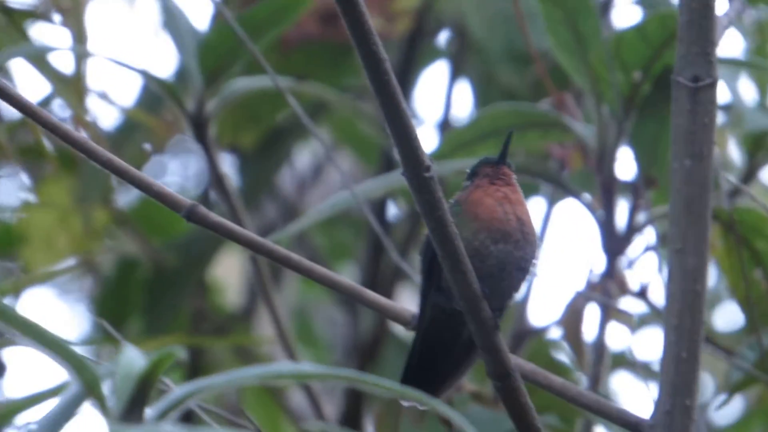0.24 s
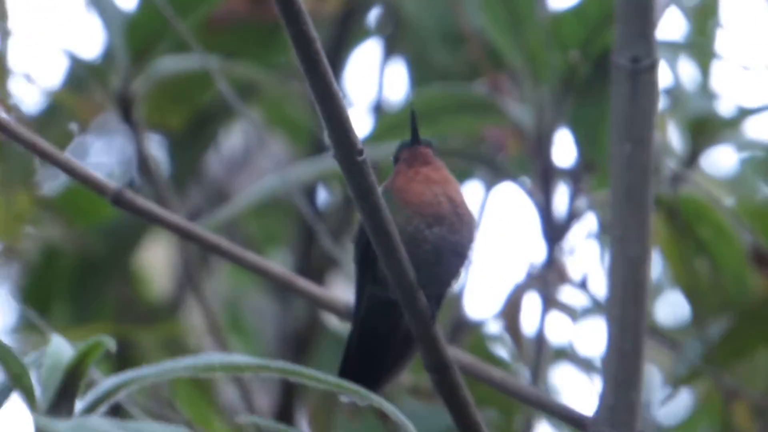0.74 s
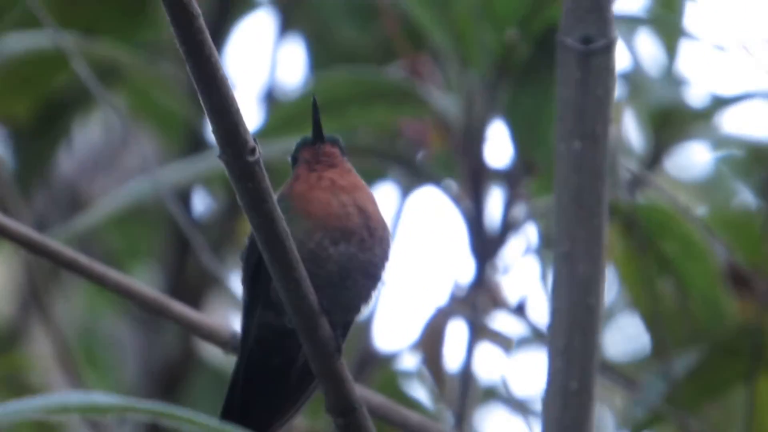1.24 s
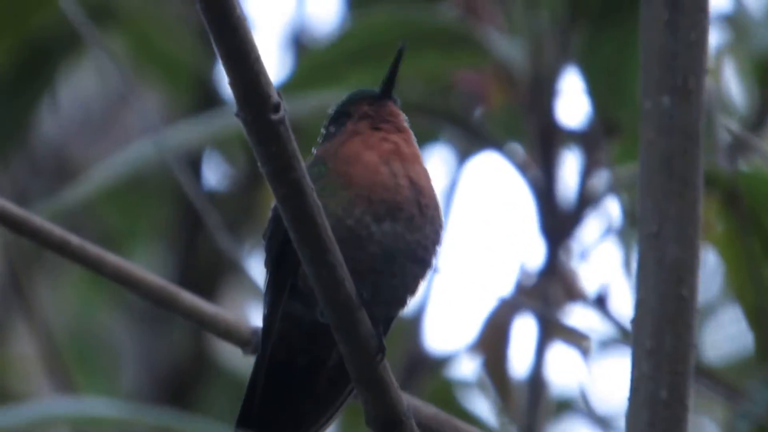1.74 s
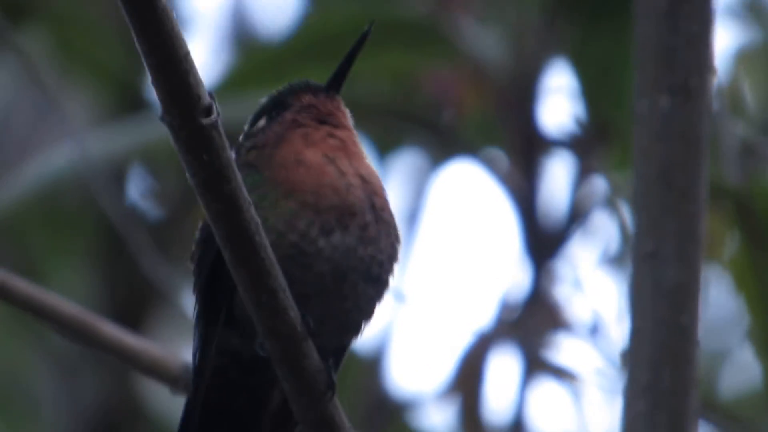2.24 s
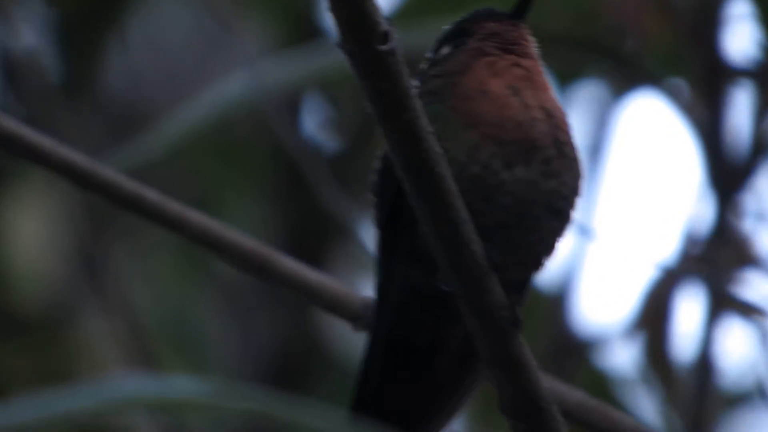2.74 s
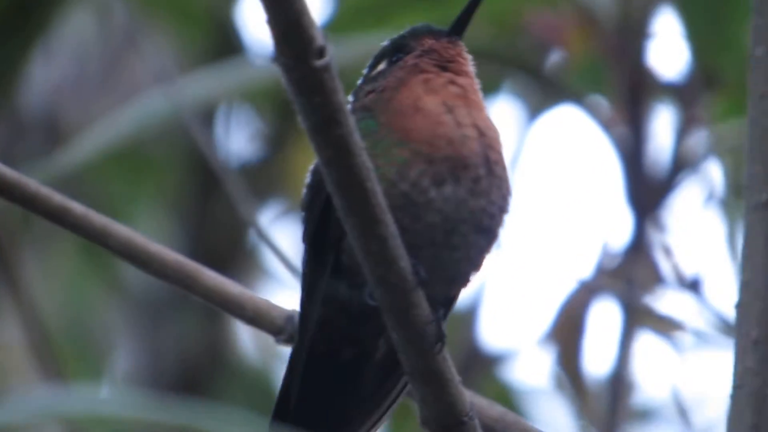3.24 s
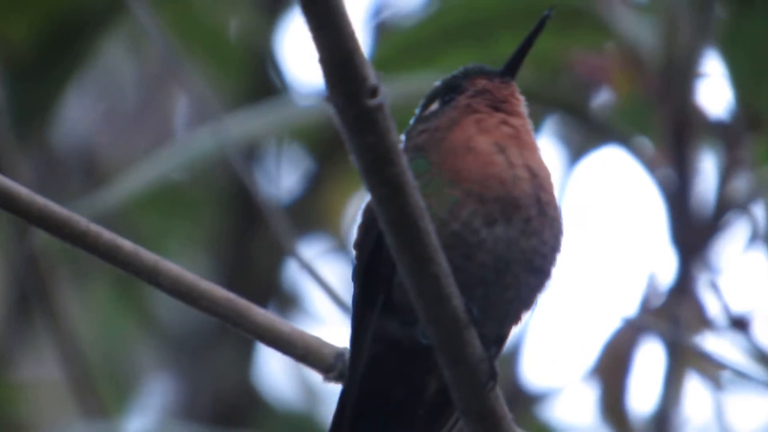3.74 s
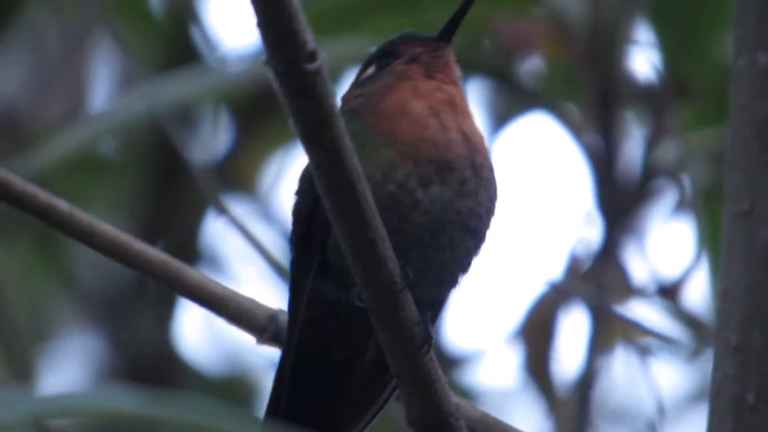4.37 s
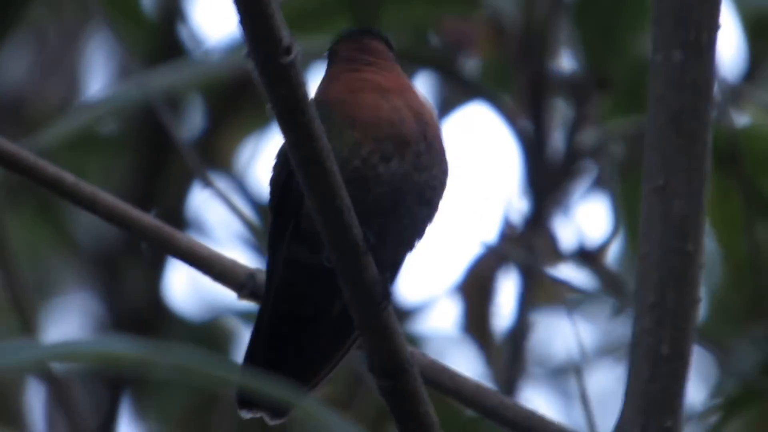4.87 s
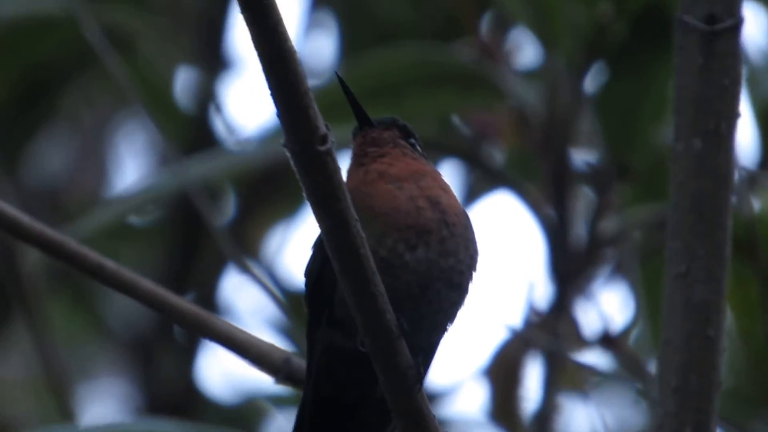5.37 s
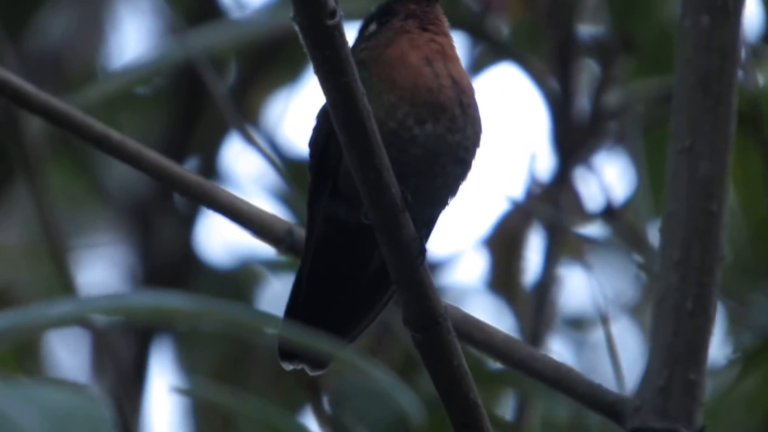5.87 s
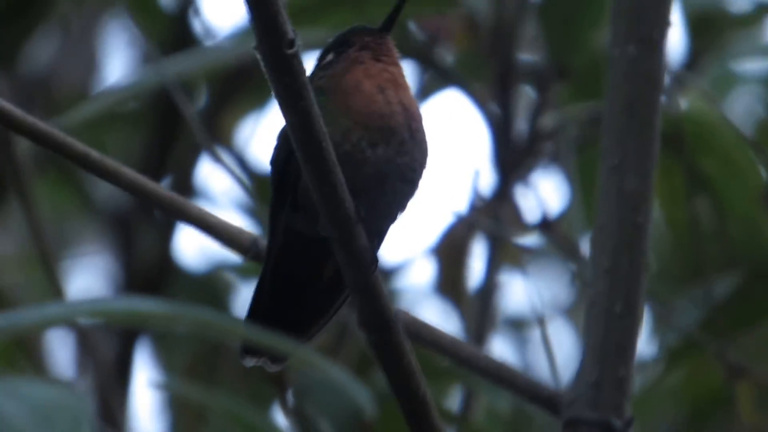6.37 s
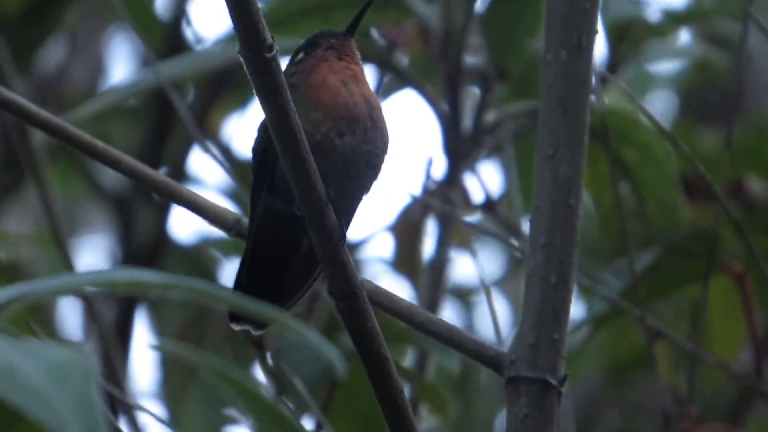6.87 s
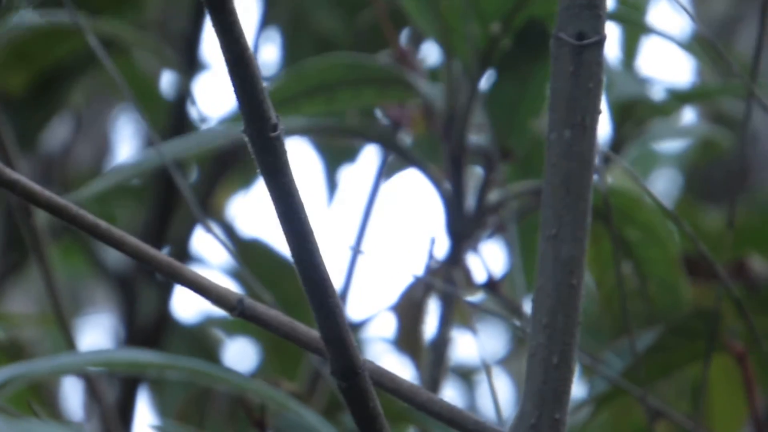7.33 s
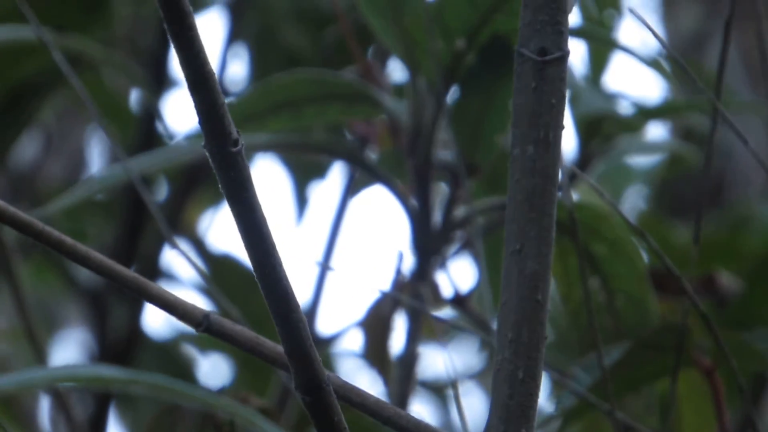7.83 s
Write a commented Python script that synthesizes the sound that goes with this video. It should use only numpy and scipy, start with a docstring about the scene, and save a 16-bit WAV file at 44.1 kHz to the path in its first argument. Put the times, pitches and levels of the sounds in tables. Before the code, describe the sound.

Quiet woodland wash with short faint whistles, fingers clicking and lens ticking on a camera, a hard click early, a distant chipping run at the end.

```python
"""Thin whistles come from the trees of a quiet mountain forest: gliding sine tones, each with an echo.
A far bird starts a run of raspy chips, from harmonics and modulated noise; a hummingbird whirrs off in puffs.
Fingers click, rub and bump on the hand-held zoom camera; its lens ticks and purrs: filtered bursts and decaying modes.
One sharp click ducks the gain of its two microphones. Fainter whistlers and a wide noise wash lie behind."""
import sys
import numpy as np
from scipy import signal
from scipy.fft import rfft, irfft, next_fast_len
from scipy.io import wavfile
from scipy.ndimage import uniform_filter1d

SR = 44100
rng = np.random.default_rng(int(sys.argv[2]) if len(sys.argv) > 2 else 0)


def output_pcm(signal):
    """Save a mono or channel-first signal as 16-bit PCM at the path in sys.argv[1].

    Samples are clipped to [-1, 1] before scaling.
    """
    pcm = np.clip(np.atleast_2d(signal).T, -1, 1) * 32767
    wavfile.write(sys.argv[1], SR, np.round(pcm).astype(np.int16))


N = 357077
TIME = np.arange(N) / SR
SIZE = next_fast_len(N, real=True)
FREQ = np.fft.rfftfreq(SIZE, 1 / SR)


def amp(db):
    """Decibels to gain."""
    return 10 ** (np.asarray(db) / 20)


def unit(x):
    """Scales to rms 1."""
    return x / np.sqrt(np.mean(x ** 2) + 1e-20)


def read(points, hz):
    """Reads a spectrum table on a log-frequency axis."""
    f, value = np.transpose(points)
    return np.interp(np.log(hz + 1), np.log(np.maximum(f, 0) + 1), value)


def add(mix, s, sound):
    """Mixes a sound in at time s."""
    part = mix[:, max(round(s * SR), 0):][:, :sound.shape[1]]
    part += sound[:, :part.shape[1]]


def band(x, lo_hz, hi_hz, order=2):
    """Causal band-pass."""
    return signal.sosfilt(signal.butter(order, [lo_hz, min(hi_hz, .49 * SR)], "band", fs=SR, output="sos"), x)


def drift(rate):
    """Slow chance curve of rms 1, with two random knots per cycle of the rate in Hz."""
    knots = np.arange(0, N / SR + 1, .5 / rate)
    return unit(np.interp(TIME, knots, rng.standard_normal(len(knots))))


def colour(x, points, tilt_db=0, size=4096):
    """Minimum-phase filter with the given spectrum, tilted in dB per octave."""
    hz = np.fft.rfftfreq(size, 1 / SR)
    gain_db = read(points, hz) + tilt_db * np.log2(hz / 2000 + .1)
    log_gain = np.log(amp(np.maximum(gain_db, -100)))
    mirrored = np.r_[log_gain, log_gain[-2:0:-1]]
    # the Hilbert transform of the log gain gives the phase of a causal response
    taps = np.fft.ifft(np.exp(signal.hilbert(mirrored).conj())).real
    return signal.fftconvolve(x, taps[None], axes=1)[:, :x.shape[1]]


def mid_side(mid, side):
    """Left and right from what the two microphones share and what differs."""
    return np.array([mid + side, mid - side])


def widen(x, side_db):
    """Raises or lowers what differs between the two microphones."""
    return mid_side(x.mean(0), (x[0] - x[1]) / 2 * amp(side_db))


def trees(x, wet_db, t60):
    """Trunks and leaves scatter a sound into a short diffuse tail of sparse random echoes."""
    t = np.arange(SR) / SR
    echoes = rng.standard_normal((2, SR)) * (rng.random((2, SR)) < 2000 / SR)
    taps = echoes * amp(-60 * t / t60) * (t > .006)
    taps = taps / np.linalg.norm(taps, axis=1, keepdims=True)
    tail = signal.fftconvolve(x, taps, axes=1)[:, :N]
    return (x + amp(wet_db) * tail) / np.hypot(1, amp(wet_db))


# thin whistles from the trees:
# [t/s, length/s, mid-glide f/Hz, rise/Hz, direct level/dB, left over right/dB, echo over direct/dB]
WHISTLE_CALLS = [(1.205, 0.088, 2330, 0, -59.5, -3, -20), (1.509, 0.11, 2335, -3, -62, -11.5, -20),
                 (2.46, 0.075, 2505, 60, -59.5, -12.5, -15), (2.73, 0.095, 2505, 48, -54.5, -11.5, -19),
                 (2.943, .078, 2402, -14, -41.5, 5, -24), (3.04, 0.085, 2525, 61, -56, -5, -10),
                 (3.292, 0.13, 2406, -16, -38.5, 5.5, -37), (3.926, 0.096, 2463, 17, -61.5, -1, -6),
                 (4.41, 0.065, 2503, 51.5, -57, -2, -2), (4.61, 0.084, 2465, 54, -50.5, -3, -4),
                 (4.896, 0.078, 2450, 34, -47, -4, -12), (5.153, 0.12, 2456, 53, -50, -3, -7),
                 (5.791, 0.095, 2470, 53, -47.5, -1, -21), (6.093, 0.086, 2476, 36, -44.5, 0, -14),
                 (6.398, 0.096, 2497, 72, -44.5, -1, -6.5), (6.695, 0.1, 2535, 17, -49, -1, -2),
                 (7.04, 0.088, 2523, 9, -48, 0, -3.5), (7.425, .08, 2520, 14, -49, 1, -5)]
ECHO_S = .068  # the slope behind throws the whistles back


def whistles(waver=0.0037, flutter=0.12, scatter_db=-50, nearness=0.49):
    """Nearly pure gliding tones with an echo; loud ones are near and dry, faint ones mostly scatter."""
    direct, scattered, wobble = np.zeros((2, N)), np.zeros((2, N)), drift(45)
    for s, length, hz, rise_hz, db, pan_db, echo_db in WHISTLE_CALLS:
        u = np.linspace(0, 1, int(max(length, .02) * SR))
        now = int(abs(s) * SR) + np.arange(len(u))
        pitch = (hz + rise_hz * (u - .5)) * (1 + waver * wobble[now])
        # the right microphone gets the tone .9 rad ahead in phase
        tone = np.sin(2 * np.pi * np.cumsum(pitch) / SR + np.array([[0], [.9]]))
        # the curve read backwards flutters the level
        tone = unit(tone * signal.windows.tukey(len(u), .7) * (1 + flutter * wobble[-now]))
        add(direct, s, amp([[db + pan_db / 2], [db - pan_db / 2]]) * tone)
        add(direct, s + ECHO_S, amp(db + echo_db) * tone)
        # scatter grows by only nearness dB per dB of the direct sound
        add(scattered, s, amp(scatter_db + nearness * (db + 38.0)) * tone)
    return direct + trees(scattered, wet_db=5.0, t60=0.85)


# a run of raspy chips that quickens; centre pitch and level arch over the run, highest at RUN_CREST of it
RUN_START_S, CHIP_GAP_S, CHIP_QUICKEN_S = 6.062, .1378, .0014
CHIP_TOP_HZ, CHIP_SAG_HZ, CHIP_TOP_DB, CHIP_SAG_DB, RUN_CREST = 2260, 75.6, -50, 4.5, .56


def chip_run(count=15):
    """Time, pitch and level of each chip, before its own chance deviations."""
    k = np.arange(count)
    sag = (k / (count - 1) / RUN_CREST - 1) ** 2
    starts = RUN_START_S + k * CHIP_GAP_S - CHIP_QUICKEN_S * k * (k - 1) / 2
    return np.transpose([starts, CHIP_TOP_HZ - CHIP_SAG_HZ * sag, CHIP_TOP_DB - CHIP_SAG_DB * sag])


# the far bird's first three harmonics: [relative level/dB], before each one's envelope
CHIP_HARMONICS_DB = [-5.5, 0.5, -8.5]


def chips(length=0.1, scoop=0.11, rasp_db=-2.5, rough=0.016, stray=0.0107, rasp_hz=950, uneven_db=1.5):
    """Each note scoops up to its pitch; the fundamental yields to the octave and a rasp that rises with it."""
    out, u, run = np.zeros((2, N)), np.linspace(0, 1, int(length * SR)), chip_run()
    # no two notes are quite alike
    qualities = rng.uniform(0.756, 1.245, (len(run), 3))
    for (s, hz, db), (depth, grit, late) in zip(run, qualities):
        jitter = unit(band(rng.standard_normal(len(u)), 31, 580))
        glide = scoop * depth * (1 - u) ** (6 * late)
        pitch = hz * (1 + stray * rng.uniform(-0.98, 1) - glide + rough * jitter)
        turns = np.cumsum(pitch) / SR
        first, second, third = (amp(level) * np.sin(2 * np.pi * (k + 1) * turns)
                                for k, level in enumerate(CHIP_HARMONICS_DB))
        tone = first * 2 * (1 - u) ** 2 + second * np.sin(np.pi * u) + third * np.sqrt(1 - u)
        # noise carried at 2.36 times the pitch
        hoarse = band(rng.standard_normal(len(u)), 40, rasp_hz, order=3)
        rasp = unit(hoarse * np.sin(2 * np.pi * 2.36 * turns))
        rasp = rasp * np.exp(-((u - 0.59 * late) / 0.45) ** 2)
        note = (unit(tone) + grit * amp(rasp_db) * rasp) * signal.windows.tukey(len(u), .3)
        add(out, s, amp(db + uneven_db * rng.uniform(-1.2, 1, (2, 1))) * unit(note))
    return out


# the whirr swells from take-off, then recedes
TAKE_OFF_S, WING_RISE_S, WING_DB, WING_FADE_DB_PER_S = 7.2, .18, -57, 15


def wings(beat_hz=40, waver=0.0402):
    """One soft, noisy puff of air a wingbeat gives a low hum, alike at both microphones."""
    turns = np.cumsum(beat_hz * (1 + waver * drift(3.7))) / SR
    puffs = np.exp(-(turns % 1) / 0.06) * (1 + .5 * rng.standard_normal(N))
    flown = np.maximum(TIME - TAKE_OFF_S, 0)
    swell = np.minimum(flown / WING_RISE_S, 1) ** 2
    return unit(band(puffs, 132, 330)) * swell * amp(WING_DB - WING_FADE_DB_PER_S * flown)


def handling():
    """Everything that reaches the microphones through the camera body."""
    return grip() + zoom_motor() + rubbing() + clicks() + lens_steps() + bumps() + switch() + tinkles() + scratches()


# a switch snaps home and rattles: [t/s, relative level/dB, treble tilt/(dB per octave)]
SWITCH_CONTACTS = [(2.2332, -17.5, -1), (2.2352, -9.5, 4.5), (2.2365, 7, 0), (2.2387, -4, -1.5),
                   (2.2411, -3, 1.5)]
# spectrum of a contact before its tilt: [f/Hz, relative density/(dB per Hz)]
SWITCH_SPECTRUM = [(25, -17), (150, -15), (400, -13.5), (600, -15.5), (780, -11), (1100, -2), (1350, 1),
                   (1850, -0.5), (2300, -5.5), (3100, -2.5), (4700, -17.5), (7000, -13), (8100, -29),
                   (9400, -19.5), (15500, -36)]
# the body rings on after it: [f/Hz, level before scatter and widening/dB, t60/s]
SWITCH_MODES = [(847, -26.5, 0.14), (1390, -33, 0.11), (2500, -35, 0.098), (2950, -39, .08)]


def switch(level_db=-23.5, tail_db=-25, lag_s=0.00026, grit_db=-27, grit_t60=0.023, side_db=3.0):
    """Hard contacts within milliseconds click at the right microphone first; nearby leaves scatter them back."""
    out, t = np.zeros((2, N)), np.arange(4096) / SR
    for s, db, tilt_db in SWITCH_CONTACTS:
        blow = rng.standard_normal((2, len(t))) * amp(grit_db - 60 * t / grit_t60)
        blow[1, 0] += 1
        blow[0, round(abs(lag_s) * SR)] += 1
        add(out, s, amp(level_db + db) * unit(colour(blow, SWITCH_SPECTRUM, tilt_db)))
    ring = sum(amp(db - 60 * t / t60) * np.sin(2 * np.pi * (hz * t + rng.random((2, 1)) / 4))
               for hz, db, t60 in SWITCH_MODES)
    add(out, SWITCH_CONTACTS[2][0], ring)  # starts with the strongest contact
    return trees(widen(out, side_db=side_db), wet_db=tail_db, t60=0.071)


# what the camera shell rings with: [lowest f/Hz (chance adds up to 3 %), relative level/dB, t60/s]
SHELL_MODES = [(823, 12, 0.061), (925, 9, 0.0745), (1250, 12.5, 0.036), (1490, -26, 0.053),
               (2000, -48, 0.014), (2773, -16, 0.059), (3022, 10.5, 0.049), (3276, 9, 0.039),
               (6830, 21, 0.005)]


def contact(t60, ring_db, grit_db, rise=0.00027, size=2048):
    """A blow inside the camera as each microphone gets it: spike, short scatter and shell modes; energy 1."""
    t = np.arange(size) / SR
    scatter = rng.standard_normal((2, size)) * amp(-60 * t / t60) * (1 - np.exp(-t / rise))
    ring = sum(amp(db - 60 * t / life)
               * np.sin(2 * np.pi * (hz * rng.uniform(1.0, 1.03) * t + rng.random((2, 1))))
               for hz, db, life in SHELL_MODES)
    blow = amp(grit_db) * unit(scatter) + amp(ring_db) * unit(ring)
    blow[0, 0] += np.sqrt(size)
    # the right microphone gets the spike up to a third of a millisecond later
    add(blow[1:], rng.uniform(0, 0.00033), np.full((1, 1), np.sqrt(size)))
    return unit(blow) / np.sqrt(size)


# fingers and buttons on the shell; a harder contact is brighter: [t/s, peak level before trim/dB, hardness/dB]
FINGER_CLICKS = [(0.444, -29.5, 1.5), (0.498, -32, 3), (0.522, -29.5, -10), (0.586, -26, 2),
                 (0.618, -27, -5), (0.6945, -29, -1), (0.698, -13, 12.5), (1.237, -28, -3.5),
                 (1.483, -34.5, -4.5), (1.916, -21.5, -10.5), (2.094, -31.5, -14.5), (2.113, -28.5, -3.5),
                 (2.392, -18.5, 0), (4.012, -31, -8.5), (4.128, -29.5, 2.5), (4.184, -35, 14),
                 (4.229, -30, -5), (4.256, -20.5, 2.5), (4.296, -31, 11), (4.353, -26.5, 7),
                 (4.366, -28, 4), (4.853, -24, -2.5), (4.964, -29, 0), (5.053, -17, -1.5), (5.59, -28.5, 0),
                 (5.978, -33.5, 1), (6.017, -31.5, 6), (6.037, -27, -10), (6.133, -21.5, -2),
                 (6.329, -34.5, -8), (6.551, -21, -1), (6.674, -27.5, -4), (6.799, -20, -0.5),
                 (7.511, -31, -1.5)]
THUD_DB, RING_DB, SNAP_DB = -11.5, -1, -15.5  # parts of a click of hardness 0, relative to its knock
THUD_LOSS, SNAP_GAIN = 0.12, 1.2  # how they follow hardness (dB per dB)
# small ticks of sliding fingers; mean level over the rub, before trim
FUMBLE_TICKS_PER_S, FUMBLE_TICK_DB, FUMBLE_HARDNESS_DB = 22, 13.5, 1


def clicks(trim_db=1.5, travel_s=.0006):
    """Each contact excites the shell's thud, knock, ring and snap; hardness shifts the weight upward."""
    out = np.zeros((2, N))
    ticks = fumbles(FUMBLE_TICKS_PER_S, FUMBLE_TICK_DB, FUMBLE_HARDNESS_DB, spread=14)
    for s, peak_db, hard_db in FINGER_CLICKS + ticks:
        blow = contact(t60=0.024, ring_db=-2.0, grit_db=9, rise=0.00043)
        thud = band(blow, 193, 670)
        knock = band(blow, 860, 2030, order=3)
        ring = band(blow, 2480, 3800, order=3)
        snap = band(band(blow, 6000, 12000), 3500, 6700, order=1)
        parts = [(THUD_DB - THUD_LOSS * hard_db, thud), (0, knock),
                 (RING_DB + hard_db, ring), (SNAP_DB + SNAP_GAIN * hard_db, snap)]
        click = sum(amp(db) * unit(part) for db, part in parts)
        crest = np.sort(abs(click).ravel())[-8:].mean()  # mean of the eight largest samples
        add(out, s + travel_s, widen(amp(peak_db + trim_db) * click / crest, side_db=-2.0))
    return out


# soft bumps of the hand: [t/s, level before trim/dB, f/Hz]
HAND_BUMPS = [(0.124, -35, 657), (0.590, -30.5, 520), (0.737, -31, 308), (4.396, -27.5, 327),
              (6.098, -29, 360), (6.159, -30, 493), (6.204, -33.5, 260), (6.326, -31, 330),
              (6.783, -32.5, 288)]
# small bumps of sliding fingers; mean level over the rub, before trim
FUMBLE_BUMPS_PER_S, FUMBLE_BUMP_DB, FUMBLE_HZ = 10, 17.5, 510


def bumps(trim_db=-13.5):
    """Soft flesh on the shell gives only a low, loose knock."""
    out = np.zeros((2, N))
    small_bumps = fumbles(FUMBLE_BUMPS_PER_S, FUMBLE_BUMP_DB, FUMBLE_HZ, spread=170)
    for s, db, hz in HAND_BUMPS + small_bumps:
        blow = band(contact(t60=0.081, ring_db=-12, grit_db=12.5), hz * .5, hz * 1.56, order=1)
        add(out, s, amp(db + trim_db) * unit(band(blow, 68, hz * 3.35)))
    return out


# skin slides on the shell: [from t/s, to t/s, level before fades/dB]
SKIN_RUBS = [(0.439, 0.714, -53), (4.122, 4.445, -56), (4.801, 5.056, -54.5), (5.967, 6.238, -54),
             (6.518, 6.828, -54)]
# spectrum of a grain: [f/Hz, relative level/dB]
RUB_SPECTRUM = [(60, -27), (330, -2), (600, -1.5), (1200, 3.5), (2000, 1.5), (3100, -3), (4500, -6.5),
                (10000, -17), (15000, -37)]


def rubbing(slips_per_s=700, spread_db=3):
    """Fingers stick and slip in tiny grains."""
    out = np.zeros((2, N))
    for start, end, db in SKIN_RUBS:
        size = int((end - start) * SR)
        sizes_db = spread_db * np.minimum(rng.exponential(1, size), 2)
        slips = (rng.random(size) < slips_per_s / SR) * amp(sizes_db)
        grains = colour(slips * rng.uniform(-0.81, 1, (2, size)), RUB_SPECTRUM)
        add(out, start, amp(db) * unit(grains) * signal.windows.tukey(size, .3))
    return out


def fumbles(per_s, over_db, middle, spread, spread_db=5.5):
    """Small chance contacts while the fingers slide: rows of (s, dB, a quality spread about its middle)."""
    rows = []
    for start, end, db in SKIN_RUBS:
        slots = np.arange(start, end - .5 / per_s, 1 / per_s)
        for s, (late, size, quality) in zip(slots, rng.uniform(-1.1, 1, (20, 3))):
            rows.append((s + (1 + late) / 2 / per_s, db + over_db + spread_db * size, middle + spread * quality))
    return rows


# a fingernail scratches the shell, high and dry: [t/s, length/s, level before fades/dB]
NAIL_SCRATCHES = [(0.44, 0.013, -49), (0.481, 0.032, -54), (4.122, 0.013, -48), (4.159, .035, -56),
                  (5.974, .012, -49), (6.006, .018, -47)]
# spectrum of a scratch: [f/Hz, relative level/dB]
SCRATCH_SPECTRUM = [(500, -20), (3000, -3), (6000, -2), (9000, -1), (12000, 1), (15500, -23)]


def scratches(slips_per_s=2500):
    """The nail's edge skips over the grain of the shell."""
    out = np.zeros((2, N))
    for s, length, db in NAIL_SCRATCHES:
        size = int(max(length, .004) * SR)
        slips = rng.standard_normal((2, size)) * (rng.random(size) < slips_per_s / SR)
        add(out, s, amp(db) * unit(colour(slips, SCRATCH_SPECTRUM)) * signal.windows.tukey(size, .5))
    return out


# a small metal fitting is jarred: [t/s, starting level/dB]
FITTING_JARS = [(2.392, -35), (6.803, -43)]


def tinkles(hz=3060, t60=0.11):
    """The fitting rings on a little longer than the shell, as one decaying sine."""
    out, t = np.zeros((2, N)), np.arange(SR // 4) / SR
    for s, db in FITTING_JARS:
        add(out, s, amp(db - 60 * t / t60) * np.sin(2 * np.pi * (hz * t + rng.random((2, 1)) / 4)))
    return out


# the lens drive hunts for focus in bursts of even steps: [start t/s, steps, gap/s, level before trim/dB]
LENS_BURSTS = [(0.05, 4, .0805, -41.5), (2.7605, 2, 0.033, -34), (3.0908, 2, .08, -33),
               (3.2127, 8, 0.042, -32.5), (3.676, 1, .04, -36.5), (3.758, 2, .0386, -29),
               (5.634, 1, .04, -38.5), (7.343, 1, .04, -39)]
# spectrum of a step: [f/Hz, relative level/dB]
LENS_SPECTRUM = [(100, -42), (600, -3), (1200, 3), (2100, -8.5), (2700, 5), (3100, 10.5), (3500, 0.5),
                 (4200, -18), (5200, -9.5), (7000, -42), (15000, -45)]
BACK_STEP_DB = -4.5  # every second step is softer


def lens_steps(trim_db=-12):
    """Each step of the lens drive is a brief scrape in a small resonant barrel."""
    out = np.zeros((2, N))
    for start, steps, gap, db in LENS_BURSTS:
        for k in range(round(steps)):
            tick = colour(contact(t60=0.038, ring_db=-17, grit_db=7, rise=0.0018), LENS_SPECTRUM)
            add(out, start + k * gap, amp(db + trim_db + BACK_STEP_DB * (k % 2)) * unit(tick))
    return out


# the zoom motor runs: [from t/s, to t/s, mid level before fades/dB]
ZOOM_RUNS = [(.4, 2.4, -59), (4.15, 5.08, -57.5)]
# spectrum of the purr: [f/Hz, relative level/dB]
ZOOM_SPECTRUM = [(30, -14), (85, 3), (150, -5.5), (280, -3.5), (420, 0.5), (640, -2), (1100, -9.5),
                 (3000, -12), (15000, -40)]


def zoom_motor(width_db=-4):
    """The lens gears give a soft low purr of coloured noise while they turn."""
    out = np.zeros((2, N))
    for start, end, db in ZOOM_RUNS:
        noise = rng.standard_normal((2, int((end - start) * SR)))
        mid, side = unit(colour(noise, ZOOM_SPECTRUM))
        purr = mid_side(mid, side * amp(width_db))
        add(out, start, amp(db) * purr * signal.windows.tukey(len(mid), .15))
    return out


# rumble of the shifting hand: [t/s, level before drift and mid/side trims/dB]
GRIP_LEVELS = [(5.85, -70), (6.61, -53), (6.72, -87), (6.78, -55), (6.89, -65), (7.17, -66), (7.18, -77),
               (8.08, -70), (8.1, -74)]


def grip(mid_db=-1, side_db=8):
    """Lumpy rumble as the hand shifts, pushing the two microphones mostly in opposite senses."""
    mid, side = unit(band(rng.standard_normal((2, N)), 23, 83)) * amp([[mid_db], [side_db]])
    level_db = np.interp(TIME, *np.transpose(GRIP_LEVELS), left=-88)
    return mid_side(mid, side) * amp(level_db + 2 * drift(7.5))


def chorus(count=150, level_db=-61):
    """Many fainter whistlers deeper in the forest, as short rising tones blurred by the trees."""
    out, u = np.zeros((2, N)), np.linspace(0, 1, int(.08 * SR))
    for when, pitch, size, side in rng.random((count, 4)):
        turns = np.cumsum(2400 + 480 * pitch ** 2 + 40 * u) / SR
        tone = np.sin(2 * np.pi * turns) * np.sin(np.pi * u)
        add(out, when * N / SR, amp(5.8 * size) * np.sqrt([[side], [1 - side]]) * tone)
    return amp(level_db) * unit(trees(out, wet_db=2.0, t60=1.0))


# far forest wash and microphone hiss: [f/Hz, relative density/(dB per Hz)]
AIR_SPECTRUM = [(25, -36), (90, -7), (250, -3), (420, -3.5), (650, -1.5), (930, -2), (1200, -6),
                (1600, -8.5), (2200, -8), (2900, -4), (4000, -15), (6400, -15), (10900, -22), (14000, -31),
                (15500, -56)]
# humps and dips in the wash: [f/Hz, full width at 1/e/Hz, height/dB]
AIR_HUMPS = [(281, 34, 3.5), (637, 25, 7), (784, 93, 5), (925, 130, 3.5), (2770, 240, -3.5),
             (3100, 740, -1), (1970, 850, -1)]
# spread of the wash between the microphones: [f/Hz, side over mid level/dB]
AIR_WIDTH = [(60, 19.5), (200, 10.5), (380, 11.5), (700, 2.5), (1290, 5), (2400, 2), (3200, -3), (4400, 1),
             (8000, 0), (15000, 1.5)]


def air(mid_db=-53.52):
    """A steady wash of shaped noise, its bass wide between the two microphones."""
    humps_db = sum(db * np.exp(-(2 * (FREQ - hz) / width) ** 2) for hz, width, db in AIR_HUMPS)
    shape_db = read(AIR_SPECTRUM, FREQ) + humps_db
    mid, side = rfft(rng.standard_normal((2, SIZE))) * amp(shape_db)
    mid = irfft(mid, SIZE)[:N]
    side = irfft(side * amp(read(AIR_WIDTH, FREQ)), SIZE)[:N]
    return amp(mid_db) * mid_side(mid, side) / mid.std()


def scene():
    """The forest, the hummingbird's wings and the camera's own noises."""
    run_of_chips = trees(chips(), wet_db=1, t60=.38)
    return whistles() + run_of_chips + wings() + handling() + chorus() + air()


# narrow dips in the camera's sound: [f/Hz]
NOTCH_CENTRES_HZ = (3950, 7900)
EDGE_HZ = 15500  # upper band limit
DUCK_DB, RECOVERY_DB_PER_S = 10.5, 16  # limit of the gain drop and its creep back


def record(dry, notch_db=-17, notch_hz=95):
    """Gain control drops smoothly around a loud sound and creeps back; two notches, overload, band limit."""
    # power in a 5 ms window centred on each moment
    power_db = 10 * np.log10(abs(uniform_filter1d((dry ** 2).mean(0), size=220)) + 1e-12)
    over_db = np.clip(2 * (power_db + 22), 0, DUCK_DB)
    # holding the peak against a rising line makes the reduction fall steadily
    fall = TIME * RECOVERY_DB_PER_S
    held_db = np.maximum.accumulate(over_db + fall) - fall
    lag = np.exp(-1 / (.02 * SR))  # the gain follows with a 20 ms time constant
    ducked = dry / amp(signal.lfilter([1 - lag], [1, -lag], held_db))
    dips_db = sum(notch_db * np.exp(-((FREQ - hz) / notch_hz) ** 2) for hz in NOTCH_CENTRES_HZ)
    out = np.clip(irfft(rfft(ducked, SIZE) * amp(dips_db), SIZE)[:, :N], -1, 1)
    low_pass = signal.firwin(511, EDGE_HZ, window=("kaiser", 9), fs=SR)
    return signal.oaconvolve(out, low_pass[None], "same")


dry = scene()
out = record(dry)
output_pcm(out)
```